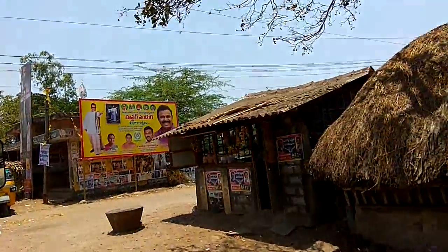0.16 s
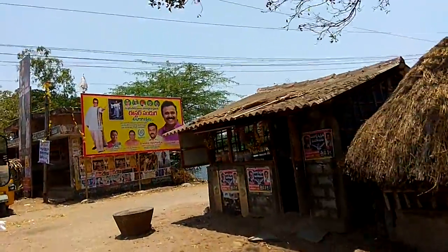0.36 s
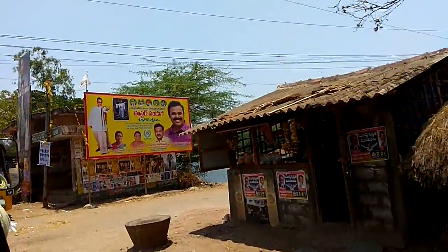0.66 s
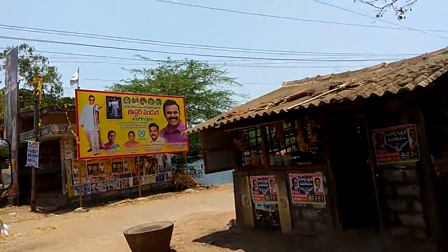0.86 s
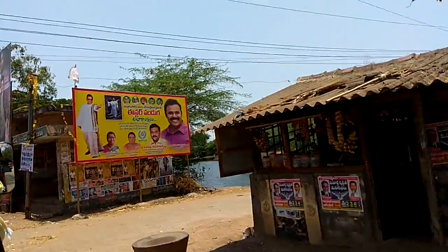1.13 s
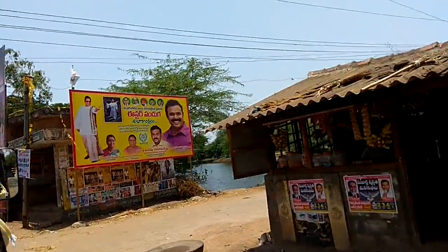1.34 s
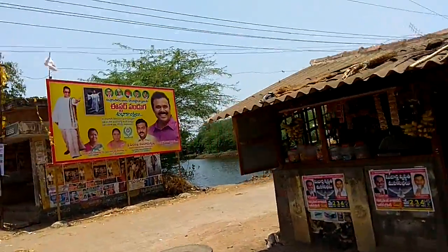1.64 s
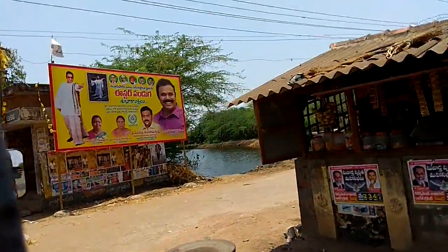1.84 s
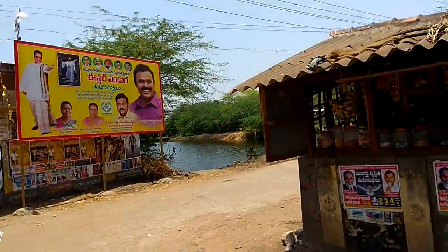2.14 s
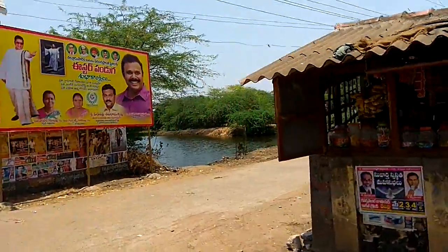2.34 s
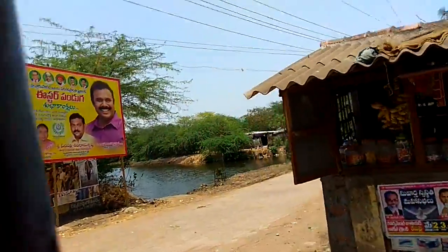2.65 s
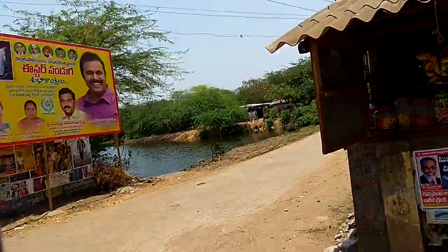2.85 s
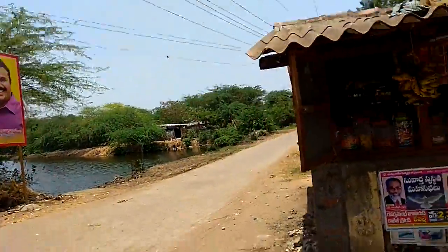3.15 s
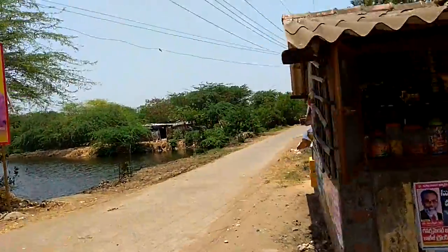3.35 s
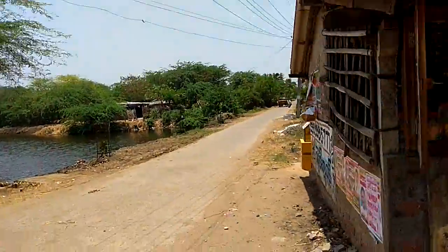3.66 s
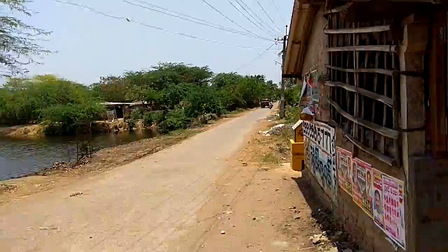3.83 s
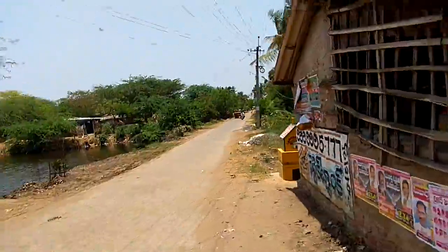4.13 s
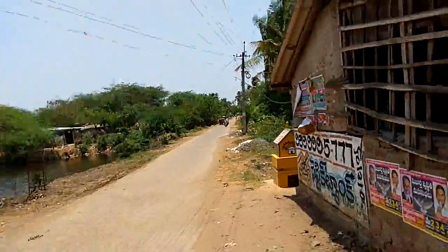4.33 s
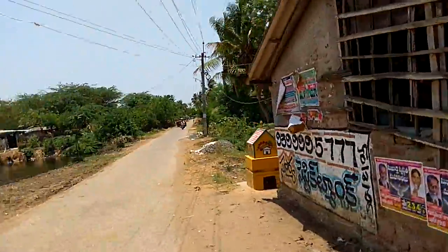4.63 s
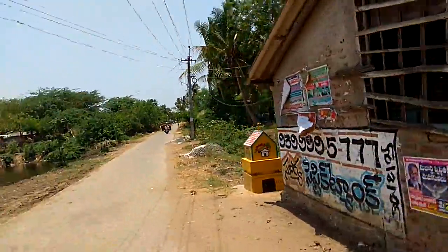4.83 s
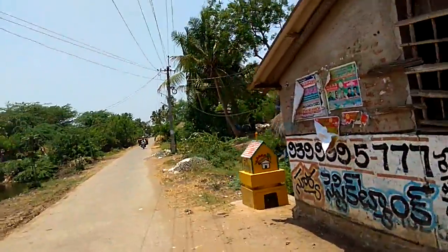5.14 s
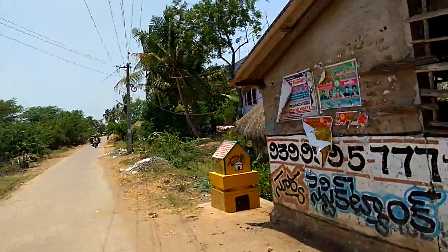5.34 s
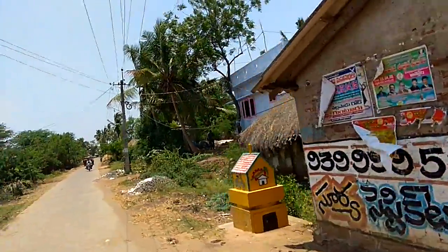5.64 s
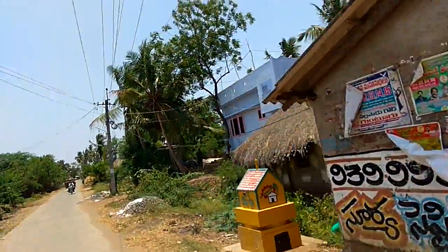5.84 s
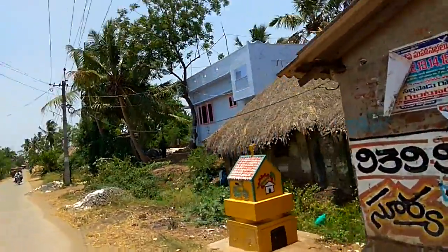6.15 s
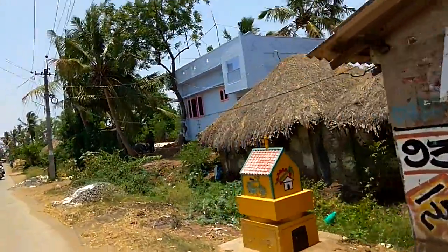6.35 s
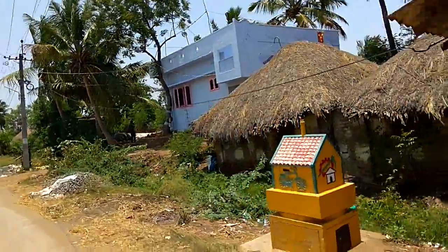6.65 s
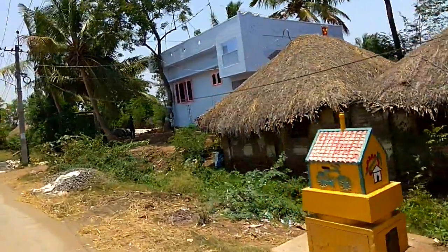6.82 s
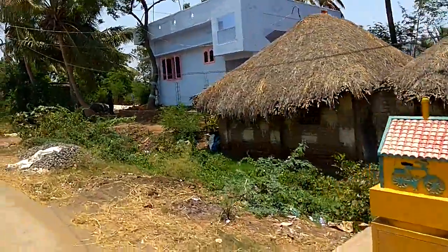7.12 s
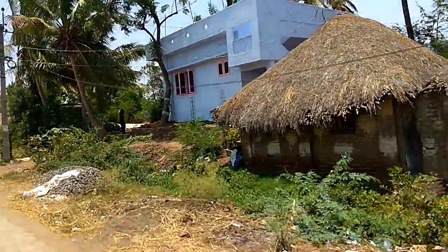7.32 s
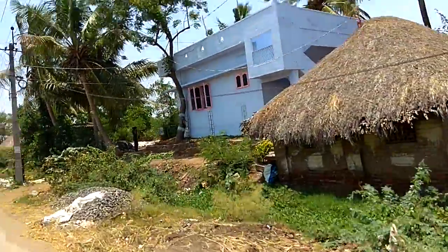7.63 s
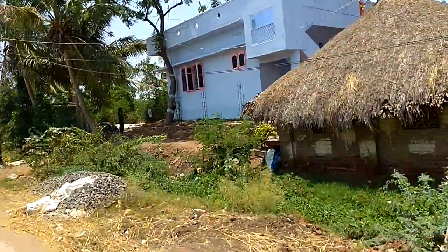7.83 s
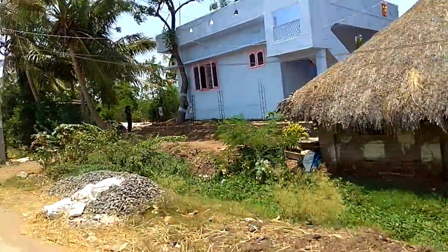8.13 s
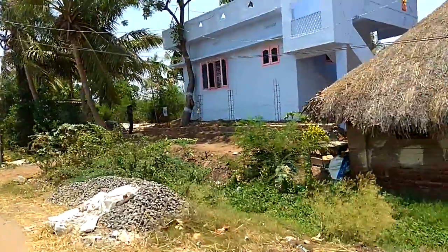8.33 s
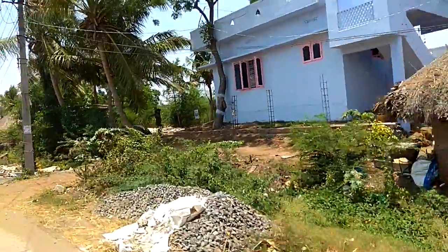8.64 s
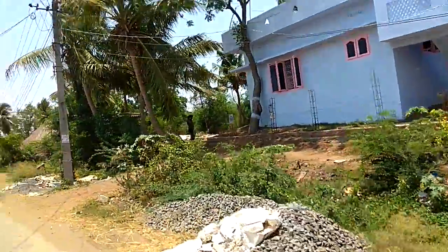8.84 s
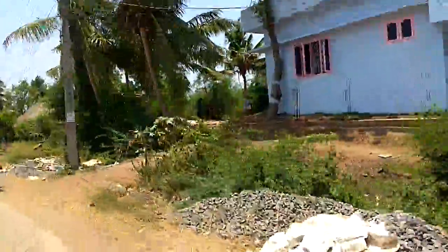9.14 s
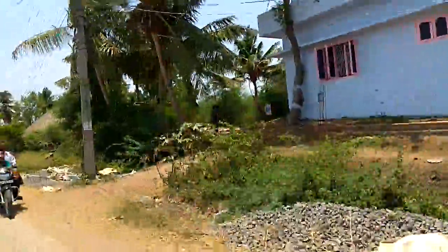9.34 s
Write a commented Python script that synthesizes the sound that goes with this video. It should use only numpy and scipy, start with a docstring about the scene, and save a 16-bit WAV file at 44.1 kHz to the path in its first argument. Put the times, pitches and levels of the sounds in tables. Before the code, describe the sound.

A slow single-cylinder motorcycle thumps along and speeds up, with wind buffeting the microphone and three close horn beeps near the end.

```python
"""A slow single-cylinder motorcycle on a village road, heard from its saddle. From the start each firing sends
a chuff of gas and a short boom out of the pipe; wind buffets the two microphone ports, a rustling hiss flares
in bursts and a few hollow knocks sound. At 1 s an oncoming rider's diaphragm horn buzzes far away. From 4.5 s
the engine speeds up; at 5.5 s loose parts sizzle under full throttle. Near 7 s the horn sounds twice, close,
the second blast dipping briefly, as the engine slows; then the engine picks up again."""
import sys
import numpy as np
from scipy import signal
from scipy.io import wavfile
from scipy.ndimage import uniform_filter1d

SR = 44100
rng = np.random.default_rng(int(sys.argv[2]) if len(sys.argv) > 2 else 0)


def wrap_up_sound(samples):
    """Save the sound to the file named by the first command line argument, as 16-bit audio."""
    columns = np.atleast_2d(samples).T
    # keep every value between -1 and 1, then stretch to whole-number steps
    tamed = np.clip(columns, -1, 1)
    steps = np.round(tamed * 32767).astype(np.int16)
    wavfile.write(sys.argv[1], SR, steps)


N = 418068
T = np.arange(N) / SR

# Crank speed. Each row: time in seconds, firings per second.
FIRING_RATE = [(0.0, 9.831), (0.6, 10.618), (1.2, 10.986), (1.6, 10.538), (2.4, 10.345), (2.8, 9.847),
               (3.4, 11.618), (3.8, 11.55), (4.0, 10.827), (4.4, 11.015), (5.0, 13.137), (5.3, 13.337),
               (6.8, 18.571), (7.0, 17.014), (7.3, 15.734), (7.55, 13.114), (9.48, 16.557)]
# Engine load. Each row: time in seconds, boom level in dB, pipe pitch in Hz, swing length in seconds,
# chuff level in dB, silencer growl in dB, boom left-right in dB.
ENGINE_LOAD = [(0.0, -11, 89, 0.03, -50.5, -35, 4), (0.6, -10, 91.4, 0.019, -39, -34, -5),
               (1.1, -12, 94.7, 0.02, -43.5, -31, -6.5), (1.27, -22, 91.2, 0.05, -39.5, -28.5, -5.5),
               (1.75, -19, 90.6, 0.034, -43.5, -41, -6.5), (2.4, -15, 91, 0.022, -38, -47, -5),
               (2.8, -9.5, 89, 0.024, -43.5, -21, 1), (3.1, -7.5, 90, 0.016, -38.5, -40, -2),
               (3.35, -12.5, 93, 0.0079, -32.5, -28, 1), (3.6, -23, 89.2, 0.0053, -42, -27, 2),
               (4.0, -13, 87, 0.028, -38, -25.5, -6.5), (4.25, -11.5, 93.3, .015, -40.5, -36, -4),
               (4.6, -8, 85, 0.0022, -39.5, -28.5, -1), (5.4, -6.5, 84, 0.0048, -39, -29.5, 0.5),
               (5.8, -6, 84, .013, -37, -23, -3), (6.47, -6, 94.4, 0.019, -41, -15.5, -3),
               (6.6, -14.5, 89.5, 0.024, -43.5, -18.5, -3), (6.85, -23, 85, 0.0095, -45, -25.5, 0),
               (7.55, -24, 84, .02, -60, -27.5, -1), (7.62, -14.5, 82, 0.031, -45, -26, -4),
               (7.85, -9.5, 80, 0.0073, -45, -27, -4), (8.3, -10.5, 85, 0.013, -47, -27, 4),
               (8.9, -7, 87.5, 0.022, -38.5, -27, -5.5), (9.48, -9.5, 89.2, 0.018, -46, -21.5, 3)]


def booms(times):
    """The pipe swings a few cycles until its end reflection chokes it; the silencer rings along."""
    # Each row: frequency in Hz, relative level in dB, t60 in seconds.
    silencer_modes = [(163.4, -2, 0.024), (204.7, -7, 0.11), (247, -8, 0.14), (741, -8, 0.049)]
    steady_db, lead_s, port_lag_samples = -11.5, .04, 10
    out, t = np.zeros((2, N)), np.arange(-lead_s, .08, 1 / SR)
    open_s = np.maximum(t + 0.02, 0)  # the valve opens before the boom builds
    rise = 1 / (1 + np.exp(-(t + 0.01356) / 0.0012))
    for s, jitter, load in zip(times, rng.standard_normal((len(times), 9)), np.transpose(load_at(times))):
        db, hz, swing_s, _, growl_db, pan_db = load
        jitter = jitter * min(db / steady_db, 1)  # loud booms vary less
        hz *= 1 + 0.016 * jitter[6]
        swing_s *= amp(2 * jitter[7])
        growl_db += 3 * jitter[0]
        pan_db += 3.5 * jitter[8]
        choke = 1 / (1 + np.exp((t - swing_s) / 0.00099))
        tail = 0.49 * (1 - choke) * np.exp(-(t - swing_s) / 0.014)
        envelope = rise * np.exp(-t / 0.078) * (choke + tail)
        phase = 2 * np.pi * hz * t
        swing = np.cos(phase) + 0.046 * np.cos(2 * phase + 0.67) + 0.0076 * np.cos(3 * phase + 0.075)
        turbulence = amp(-22.5) * unit_rms(resonate(rng.standard_normal(len(t)), 157.4, 43.3))
        boom = amp(db) * envelope * (swing + turbulence)
        modes = sum(amp(mode_db + 1.5 * j - 60 * open_s / t60_s)
                    * np.sin(2 * np.pi * mode_hz * (1 + j / 250) * open_s)
                    for j, (mode_hz, mode_db, t60_s) in zip(jitter[2:], silencer_modes))
        growl = amp(growl_db) * modes * (1 - np.exp(-open_s / 0.0023))
        add(out, s - lead_s, panned(boom + growl, pan_db))
    return np.array([out[0], np.roll(out[1], port_lag_samples)])


def chuffs(times):
    """Gas rushes past the valve before each boom: a noise puff that rings the casing unevenly."""
    # Each row: centre in Hz, width per filter stage in Hz, relative level in dB.
    casing_modes = [(686, 810, -8.5), (1045, 160, -2.5), (1425, 216, -1), (1763, 380, 0.5), (2240, 190, -4),
                    (2387, 590, -1), (2460, 285, -2.5), (2724, 740, -6), (4540, 1170, -20.5),
                    (6700, 2400, -8.5), (10300, 1500, -14)]
    gate, t = np.zeros((2, N)), np.arange(0, .12, 1 / SR)
    starts = times - .03 - .15 / curves(FIRING_RATE, times)[0]  # 30 ms plus 0.15 cycle early
    puff = 2 * (1 - np.exp(-t / 0.0065)) ** 2 * (np.exp(-(t / 0.039) ** 2) + 0.049 * np.exp(-t / 0.07))
    for s, jitter, db in zip(starts, rng.standard_normal((len(times), 3)), load_at(times)[3]):
        add(gate, s, amp(db + jitter[2] + 0.76 * jitter[:2, None]) * puff)
    left, other = rng.standard_normal((2, N))
    gas = gate * np.array([left, 0.022 * np.roll(left, 9) + 0.79 * other])
    puff_gains = amp(2.0 * rng.standard_normal((len(times) + 1, len(casing_modes))))
    mode_gains = puff_gains[np.searchsorted(starts, T)].T
    return amp(9.0) * sum(amp(db) * resonate_twice(gain * gas, hz, width_hz)
                          for gain, (hz, width_hz, db) in zip(mode_gains, casing_modes))


def drone():
    """Exhaust tones follow the crank speed and stand out under load; each wavers by itself."""
    # Each row: multiple of the firing rate, relative level in dB.
    orders = [(10, -6.5), (11, -32), (12, -11), (13, -10.5), (15, -15), (16, -12.5)]
    phase = 2 * np.pi * crank_cycles()
    boom_db, *_, growl_db, _ = curves(ENGINE_LOAD, T)
    wavers_db = 3.5 * drift(count=len(orders), seconds=0.11)
    tones = sum(amp(db + waver_db) * np.cos(k * phase + rng.uniform(0, 2 * np.pi))
                for waver_db, (k, db) in zip(wavers_db, orders))
    return panned(amp(growl_db + 0.43 * boom_db + 2.5) * tones, pan_db=-5.0)


def crank_cycles():
    """Firing cycles completed; a whole number at each boom."""
    return np.cumsum(curves(FIRING_RATE, T)[0]) / SR - .177


def load_at(times):
    """Engine load at each firing, with odd firings lifted or sunk."""
    # Each row: time in seconds, boom offset in dB, chuff offset in dB.
    odd_firings = [(.22, -9, 4), (.12, 1, 5), (.51, 1, 4.5), (.6, 0, 0), (.88, -3.5, -1), (1.16, -0.5, 1),
                   (2.78, 0, -8), (3.35, 1.5, -18), (3.78, -1.5, -3), (4.14, -1, 2), (4.23, 1.5, 6),
                   (6.8, -4, -18), (7.77, 2.5, -13), (7.84, 2, 0), (8.54, -0.5, 1), (8.94, 0, -14),
                   (.79, -5.5, 5), (.97, 1, 5), (2.19, -4.5, 2.5), (2.39, 4, -1.5), (2.88, -1, -18),
                   (3.08, 0, 4.5), (3.26, 1.5, 2), (3.69, -9, 4.5), (3.87, -2.5, 6), (4.05, -19, 2.5),
                   (6.41, -2, 8), (6.52, 0.5, 10.5), (8.06, -3, -21), (8.13, 3.5, 0), (8.41, -4, 0),
                   (8.48, -6.5, 0), (9.0, 0.5, -3)]
    boom_db, hz, swing_s, chuff_db, growl_db, pan_db = curves(ENGINE_LOAD, times)
    odd_db = np.zeros((len(times), 2))
    for s, *offsets_db in odd_firings:
        odd_db[np.argmin(abs(times - s))] = offsets_db
    return boom_db + odd_db[:, 0], hz, swing_s, chuff_db + odd_db[:, 1], growl_db, pan_db


def sizzle():
    """Loose parts buzz in a bright band at full throttle."""
    # Each row: time in seconds, level in dB.
    levels = [(5.452, -82), (5.57, -44.5), (5.9, -42), (6.0, -50.5), (6.232, -36.5), (6.35, -46),
              (6.46, -34), (6.55, -48), (6.7, -74)]
    # Each row: frequency in Hz, relative density in dB.
    colour = [(3000, -48), (4900, -30), (5200, 5.5), (6300, 5.5), (7500, 3), (7900, -34),
              (11500, -30), (12500, -7), (14500, -10), (16000, -40)]
    out, t = np.zeros((2, N)), np.arange(levels[0][0], levels[-1][0], 1 / SR)
    db, = curves(levels, t)
    buzz = patchy_noise(colour, coherence=0.09, patch_db=5.0, fft_size=256, n=len(t))
    add(out, t[0], panned(amp(db) * buzz, pan_db=13.5))
    return out


def wind():
    """Wind on the ports: lumpy low noise, deeper buffeting and single gusts that slap a cavity."""
    # Each row: time in seconds, level in dB, buffeting offset in dB, left-right in dB.
    strength = [(0.0, -25, 9.5, -7), (0.2, -19, 5, -0.5), (0.3, -25, -6, 10), (0.42, -25.5, 4, 7),
                (0.6, -32, 2.5, -2), (1.05, -32.5, 1, 1), (1.5, -44.5, 9.5, -2), (2.0, -36.5, -2, -2),
                (2.8, -33.5, 8.5, -1), (2.88, -22, 5, 0), (3.33, -29, -8, -3), (3.69, -44.5, -9, 13.5),
                (4.3, -34.5, 5, -4.5), (4.94, -37, 3, 5), (5.04, -24.5, 6, 2), (5.2, -34, 6, -2),
                (5.6, -28, 0, -4), (6.5, -26.5, -24, -1), (6.84, -28, -27, 3), (7.02, -41, -15, 3),
                (7.36, -33, -6, -9.5), (7.52, -43.5, -12, 0), (7.7, -23, 5.5, -11),
                (8.05, -30.5, -3, -16.5), (8.27, -25, 10.5, -14), (8.45, -25, -9, -10),
                (8.7, -25.5, 7.5, -8), (9.48, -29, -10, 6)]
    # Each row: frequency in Hz, relative density in dB.
    colour = [(30, -39), (60, -3), (130, 9.5), (250, -10.5), (500, -16.5), (1000, -30), (2500, -48),
              (16000, -94)]
    # Each row: start in seconds, level in dB, pitch in Hz, left-right in dB.
    slaps = [(0.038, -23, 348, 14), (0.141, -17, 291, 16), (0.16, -13, 261, 11), (0.177, -17, 280, 10),
             (2.891, -16.5, 292, -5), (2.92, -21, 220, -10), (5.044, -23.5, 384, -20),
             (5.757, -21.5, 360, 4), (6.551, -12, 241, 2.5), (7.641, -18, 246, -13), (7.747, -31, 240, -2),
             (7.791, -27.5, 398, -14), (8.029, -20.5, 355, -13), (8.054, -15.5, 457, -10.5),
             (8.09, -24, 390, -11), (8.374, -21, 410, -18), (8.52, -19, 236, -25), (8.578, -18, 274, -13)]
    db, deep_db, pan_db = curves(strength, T)
    db = db + drift(count=2, seconds=0.1)
    buffeting = unit_rms(resonate_twice(rng.standard_normal((2, N)), hz=59.5, width_hz=18))
    lumps = patchy_noise(colour, coherence=.3, patch_db=3, fft_size=1024)
    out = panned(amp(db + 1.0) * lumps + amp(db + deep_db) * buffeting, pan_db)
    t, slap_t60_s = np.arange(0, .15, 1 / SR), 0.067
    for s, db, hz, pan_db in slaps:
        eddy = unit_rms(resonate_twice(rng.standard_normal((2, len(t))), hz, 0.49 * hz))
        thud = np.sin(2 * np.pi * hz * t) + 0.93 * eddy
        envelope = amp(db - 60 * t / slap_t60_s) * (1 - np.exp(-t / 0.0014))
        add(out, s - .003, panned(envelope * thud, pan_db))
    return out


def horn():
    """A buzzing diaphragm, tenth harmonic on the tone disc; wall echoes make each harmonic waver."""
    # Each row: start in seconds, length in seconds, start level in dB, end level in dB, left-right in dB.
    blasts = [(0.996, 0.76, -55, -52.5, 2), (1.938, 0.17, -56, -56, 2), (2.159, 0.16, -45, -46, -1),
              (6.843, 0.14, -18, -23.5, -2.5), (7.134, .215, -21.5, -19, -3), (7.366, 0.1, -17, -23.5, -2)]
    # Buzz rate of each blast in Hz.
    buzz_hz = [363.2, 363.0, 362.0, 364.2, 364.2, 364.2]
    # Each row: multiple of the buzz rate, relative level in dB.
    harmonics = [(7, -25), (8, -29), (10, 0), (11, -25), (12, -22), (13, -23), (14, -31), (15, -28),
                 (16, -31), (17, -29), (18, -35), (20, -32), (22, -39), (29, -35), (32, -39)]
    attack_s, stop_s = 0.014, 0.0027
    echo_db, echo_t60_s, echo_pitch_drop = -11.5, 0.47, .022
    port_phase_rad = np.array([[0], [.7]])  # the sound reaches one port first
    out = np.zeros((2, N))
    for (s, length_s, start_db, end_db, pan_db), hz in zip(blasts, buzz_hz):
        t = np.arange(0, length_s + .15, 1 / SR)
        after_s = np.maximum(t - length_s, 0)
        db = np.interp(t, [0, length_s], [start_db, end_db])
        direct = np.exp(-after_s / stop_s)
        echo = (1 - direct) * amp(echo_db - 60 * after_s / echo_t60_s)
        envelope = (1 - np.exp(-t / attack_s)) * (direct + echo) * signal.windows.tukey(len(t), .03)
        phase = 2 * np.pi * np.cumsum(hz * (1 - echo_pitch_drop * (1 - direct))) / SR
        waver = smooth(rng.standard_normal((2, 2, len(t) + 9000)), 400, 300)
        waver /= waver.std()
        waver_db = 1.5 - (db + 27) / 12  # far blasts waver more
        ninth_db = -20 - 0.41 * (db + 20)
        buzz = amp(-19) * unit_rms(resonate(rng.standard_normal((2, len(t))), 4300, 1800))  # contacts
        for k, harmonic_db in harmonics + [(9, ninth_db)]:
            swell, bend = waver[:, :, 250 * k:250 * k + len(t)]
            tone = np.cos(k * phase + 0.63 * bend + rng.uniform(0, 7.8) + port_phase_rad)
            buzz += amp(harmonic_db + waver_db * swell) * tone
        add(out, s, panned(amp(db) * envelope * buzz, pan_db))
    return out


def flares():
    """Sudden bursts of hiss; the louder ones rise faster."""
    # Each row: start in seconds, level in dB, left-right in dB, t60 in seconds, tilt in dB per octave.
    bursts = [(0.0584, -59, 6, 0.18, 4), (0.6, -29.5, -1.5, 0.24, 0.5), (2.7089, -4.5, 0.5, 0.22, 0),
              (2.8, -5.5, -3, 0.054, 6.5), (2.8576, -26.5, 14, 0.15, 4), (3.1389, -29, 0, 0.63, 1.5),
              (3.2267, -24.5, -1, 0.17, 1), (3.84, -25, -1, 0.062, 2), (4.3827, -24, 1, 0.1, 2.5),
              (4.4695, -27.5, 9.0, 0.14, 5), (4.7311, -27, 3, 0.24, -0.5), (4.9621, -27.5, 3, 0.42, 3.5),
              (5.562, -30.5, 12, 0.17, 5), (5.6475, -25, 14, 0.075, 8), (5.7218, -26.5, 14, 0.16, 3.5),
              (5.859, -31, 7, 0.3, 6), (6.058, -29.5, 6, 0.098, 12), (6.237, -22, 7, 0.11, 5),
              (6.289, -30.5, -3, 0.23, -5), (6.409, -30, 8, 0.63, 19), (6.4672, -18.5, 6, 0.37, 8.5),
              (7.5187, -20, -4, 0.089, 4.5), (7.55, -19, -8, 0.13, 8.5), (7.5979, -23.5, -2.0, 0.13, -0.5),
              (7.8524, -19.5, -5, 0.18, 5), (7.969, -22.5, -6, 0.085, 4), (8.1416, -20.5, -1, 0.16, 4.5),
              (8.179, -22.5, -21, 0.12, 7), (8.208, -18, -9, 0.17, 6.5), (8.2807, -20, -7, 0.086, 4),
              (8.4519, -25.5, -1.5, 0.16, 6), (8.8553, -21, 8, 0.085, 10), (8.918, -19, 7, 0.052, 4),
              (8.982, -7, -9, 0.062, 7), (9.0488, -8, -1, 0.14, 8), (9.4151, -15, -0.5, 0.25, 6.5)]
    # Each row: frequency in Hz, relative density in dB.
    colour = [(290, -29), (500, -16), (687, 0.5), (853, -3), (1160, -3.5), (1500, 3), (1730, -1.5),
              (2310, -1.5), (4060, -7.5), (5050, -4), (7570, -6.5), (11500, -6), (15800, -29)]
    out, t = np.zeros((2, N)), np.arange(0, .3, 1 / SR)
    for s, db, pan_db, t60_s, tilt_db in bursts:
        hiss = patchy_noise(colour, coherence=0.073, patch_db=2.5, fft_size=256,
                            tilt_db=np.full(len(t), tilt_db), n=len(t))
        rise_s = 0.0047 * amp(-0.12 * (db + 28))
        envelope = amp(db - 4.5 - 60 * t / t60_s) * (1 - np.exp(-t / rise_s)) ** 2
        add(out, s - .003, panned(envelope * hiss, pan_db))
    return out


def rustle():
    """A bright patchy hiss that swells and flickers, shaken by each firing."""
    # Each row: time in seconds, level in dB, left-right in dB, tilt in dB per octave.
    swells = [(0.0, -44.5, 0, -3.5), (1.0, -49.5, 2, -2), (2.0, -45.5, 3, -4), (2.62, -50, 2, -2.5),
              (2.83, -28, 1, 2), (2.92, -43.5, 1, -2.5), (3.45, -39.5, 0, -5), (3.7, -55, 0, -0.5),
              (4.07, -38.5, 0.5, -4), (4.5, -50, 4.5, -1), (4.9, -37, 2, -3.5), (5.05, -43, 4, -4.5),
              (5.13, -40.5, -5, -3.5), (5.55, -43, 15, -3.5), (5.7, -35, -2, -4), (6.15, -39.5, 7.5, -3),
              (6.42, -33.5, 1.5, -0.5), (6.6, -43, 2, -1.5), (6.78, -31, 3, -4), (6.9, -37.5, 2, -3.5),
              (7.36, -38.5, 0.5, -3.5), (7.47, -32, -1, -3.5), (7.66, -39.5, 2, -4), (7.78, -48, 4, -2.5),
              (7.95, -40, -2, -3.5), (8.24, -40.5, 12, -4), (8.5, -56, -3, -0.5), (8.85, -44.5, -1, -2),
              (9.03, -25.5, -1, 1.5), (9.12, -32.5, -3, 1.5), (9.3, -54, -4, -2), (9.48, -30, -6, -5.5)]
    # Each row: frequency in Hz, relative density in dB.
    colour = [(1880, -1), (3200, -2.5), (3590, 0), (4070, -13), (4350, -2), (4840, -5), (5650, 4.5),
              (7280, -4), (11800, 2.5), (15800, -13)]
    db, pan_db, tilt_db = curves(swells, T)
    throb_db = 2 * np.cos(2 * np.pi * (crank_cycles() + 0.37))
    flicker_db = 0.94 * unit_rms(smooth(rng.standard_normal(N), 500, 300))
    hiss = patchy_noise(colour, coherence=0.016, patch_db=3.5, fft_size=512, tilt_db=tilt_db)
    return panned(amp(db + throb_db + flicker_db) * hiss, pan_db)


def knocks():
    """Each knock is a quick puff of noise ringing one hollow."""
    # Each row: start in seconds, level in dB, pitch in Hz, left-right in dB.
    hits = [(0.062, -36, 980, -2), (0.164, -38, 650, -8), (0.173, -28, 970, 6.5), (2.006, -31.5, 735, 2),
            (2.029, -33, 700, 8), (2.072, -34.5, 720, -17), (3.921, -32, 760, 4), (6.614, -30, 690, 2),
            (6.721, -28.5, 796, -1)]
    out, t, t60_s = np.zeros((2, N)), np.arange(0, .12, 1 / SR), 0.056
    for s, db, hz, pan_db in hits:
        hollow = unit_rms(resonate(rng.standard_normal((2, len(t))), hz, 0.1 * hz))
        ring = np.sin(2 * np.pi * hz * t) + 2.4 * hollow
        envelope = amp(db - 60 * t / t60_s) * (1 - np.exp(-t / 0.0043))
        add(out, s - .002, panned(envelope * ring, pan_db))
    return out


def road():
    """Steady hiss of the road."""
    # Each row: frequency in Hz, relative density in dB.
    colour = [(120, -55), (200, 11), (379, -11.5), (760, -4.5), (1390, -15.5), (2490, -13.5), (4010, -23),
              (6690, -38.5), (8490, -31.5), (11000, -21), (13700, -49), (14400, -76), (15800, -87)]
    return amp(-46.5) * patchy_noise(colour, coherence=0.018, patch_db=6.5, fft_size=1024)


def patchy_noise(colour, coherence, patch_db, fft_size, tilt_db=None, n=N):
    """Stereo noise of rms 1 with drifting spectral patches; tilt_db is per octave, for each sample."""
    hop = fft_size // 4
    frames, hz = n // hop + 5, np.fft.rfftfreq(fft_size, 1 / SR)
    a, b, c, d, patches = rng.standard_normal((frames, len(hz), 5)).T
    patches = unit_rms(uniform_filter1d(uniform_filter1d(patches, size=6, axis=0), size=8, axis=1))
    colour_hz, colour_db = np.transpose(colour)
    shape = amp(np.interp(np.log(hz + 1), np.log(colour_hz), colour_db))[:, None]
    if tilt_db is not None:
        octaves = np.log2((hz[:, None] + 50) / 5000)
        shape = shape * amp(octaves * tilt_db[np.minimum(np.arange(frames) * hop, n - 1)])
    shape = shape / np.linalg.norm(shape, axis=0)
    left = a + 1j * b
    right = coherence * left + np.sqrt(1 - coherence ** 2) * (c + 1j * d)
    spectra = np.array([left, right]) * shape * amp(patch_db * patches)
    return unit_rms(signal.istft(spectra, nperseg=fft_size, noverlap=fft_size - hop)[1][:, :n])


def drift(count, seconds):
    """Slow random curves of rms 1 that change over about the given time."""
    grid_s = np.arange(0, N / SR + .02, .01)
    window = np.hanning(round(seconds * 200))[None]
    slow = unit_rms(signal.fftconvolve(rng.standard_normal((len(grid_s), count)).T, window, "same"))
    return np.array([np.interp(T, grid_s, row) for row in slow])


def resonate(x, hz, width_hz):
    """Two-pole resonance, gain 1 at its centre."""
    return signal.lfilter(*signal.iirpeak(hz, hz / width_hz, SR), x)


def resonate_twice(x, hz, width_hz):
    """Two equal resonances in series."""
    return resonate(resonate(x, hz, width_hz), hz, width_hz)


def smooth(x, first_samples, second_samples):
    """Two moving averages in series."""
    return uniform_filter1d(uniform_filter1d(x, first_samples), second_samples)


def amp(db):
    """Gain of a level in dB."""
    return 10 ** (np.asarray(db) / 20)


def unit_rms(x):
    """Scales to rms 1."""
    return x / np.sqrt(np.mean(x ** 2) + 1e-20)


def curves(rows, t):
    """Value columns of a table, interpolated at times t."""
    s, *columns = np.transpose(rows)
    return [np.interp(t, s, column) for column in columns]


def panned(x, pan_db):
    """Splits a left-right difference evenly between the channels."""
    return x * amp(np.array([pan_db / 2, -pan_db / 2]).reshape(2, -1))


def add(mix, start_s, sound):
    """Mixes in a stereo sound, cut to fit."""
    at = round(start_s * SR)
    sound = sound[:, max(-at, 0):]
    part = mix[:, max(at, 0):][:, :sound.shape[1]]
    part += sound[:, :part.shape[1]]


def scene():
    """Engine, wind, knocks, rustle, flares and horn over the road hiss."""
    firing_s = np.flatnonzero(np.diff(np.floor(crank_cycles())) > 0) / SR
    engine = booms(firing_s) + drone() + chuffs(firing_s) + sizzle()
    return engine + wind() + knocks() + rustle() + flares() + horn() + road()


def record(dry):
    """Small microphones lose the deepest bass and round off peaks; a low-pass limits the band."""
    low_hz, high_hz, ceiling = 36, 15900, .98
    thin = signal.sosfilt(signal.butter(2, low_hz, "highpass", fs=SR, output="sos"), dry)
    rounded = thin / (1 + (thin / ceiling) ** 6) ** (1 / 6)
    lowpass = signal.firwin(511, high_hz, window=("kaiser", 9), fs=SR)
    return signal.oaconvolve(rounded, lowpass[None], "same")


dry = scene()
out = record(dry)
wrap_up_sound(out)
```